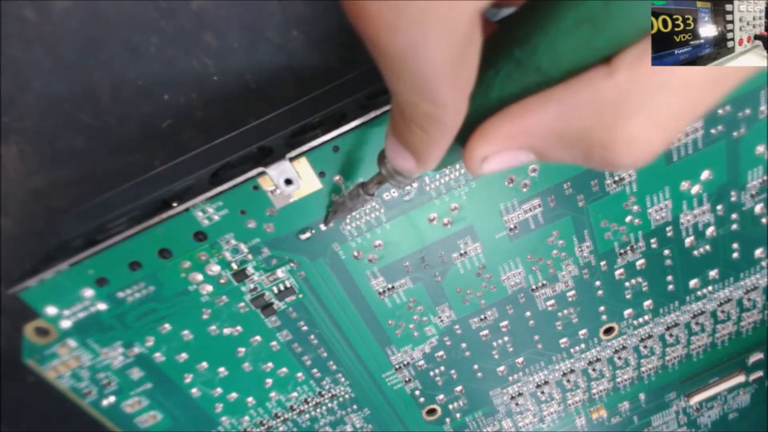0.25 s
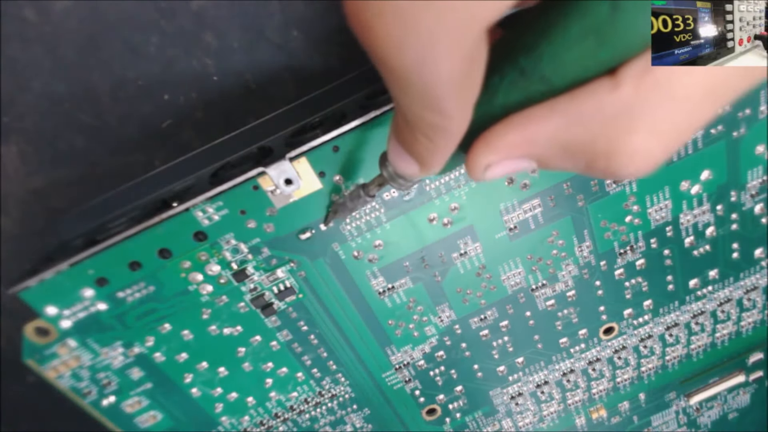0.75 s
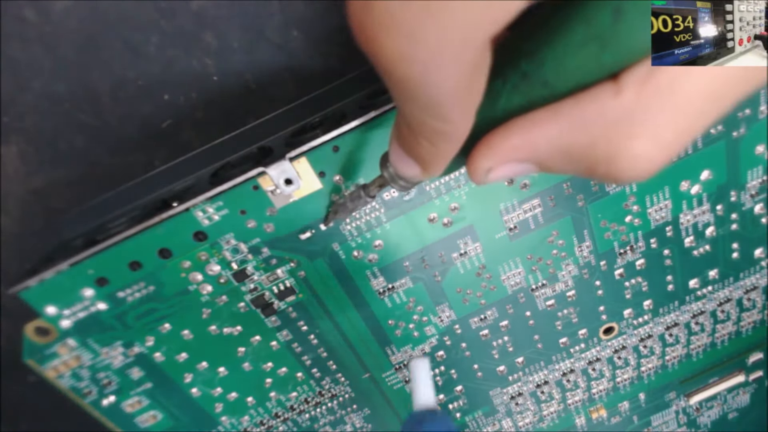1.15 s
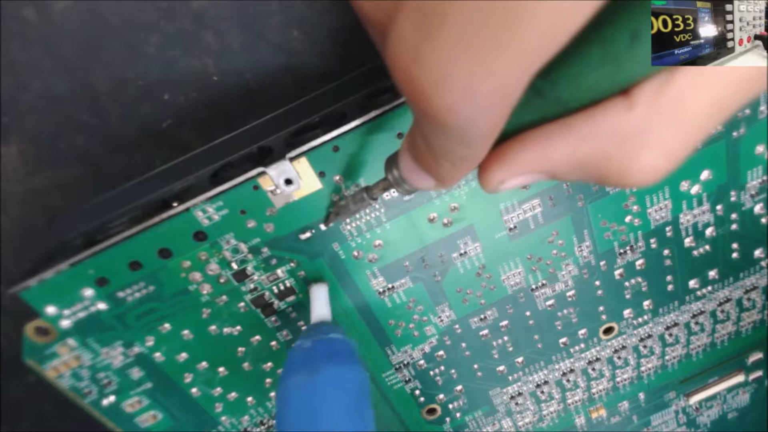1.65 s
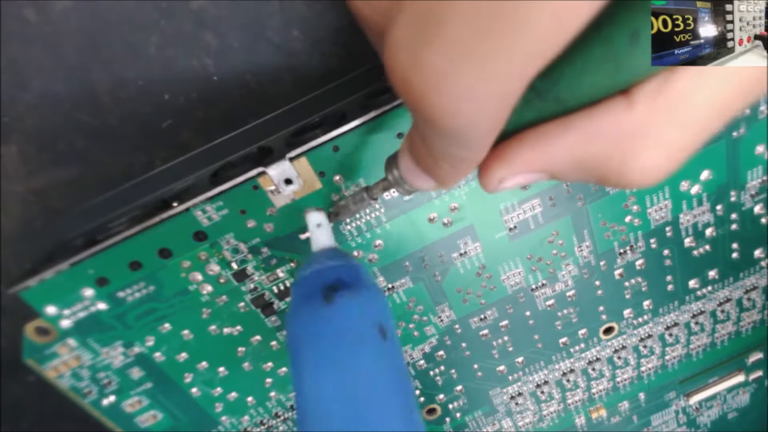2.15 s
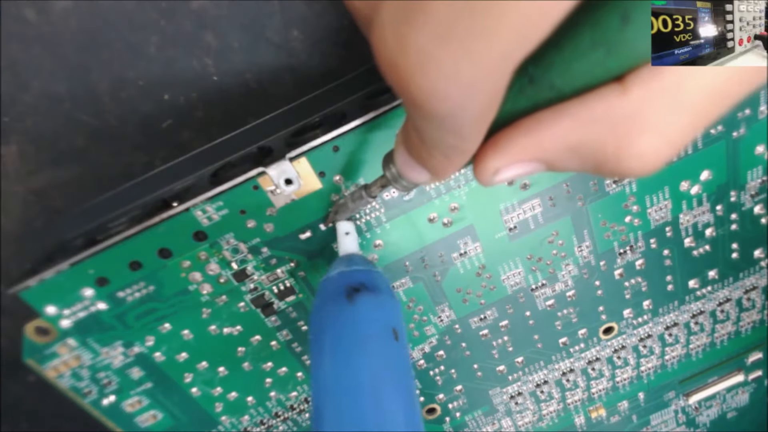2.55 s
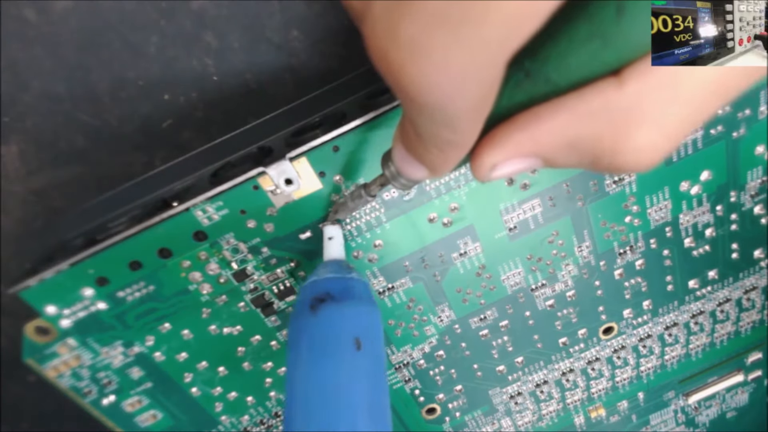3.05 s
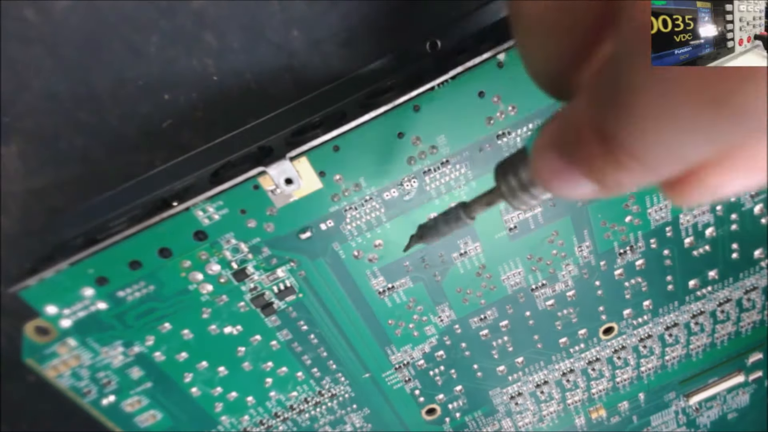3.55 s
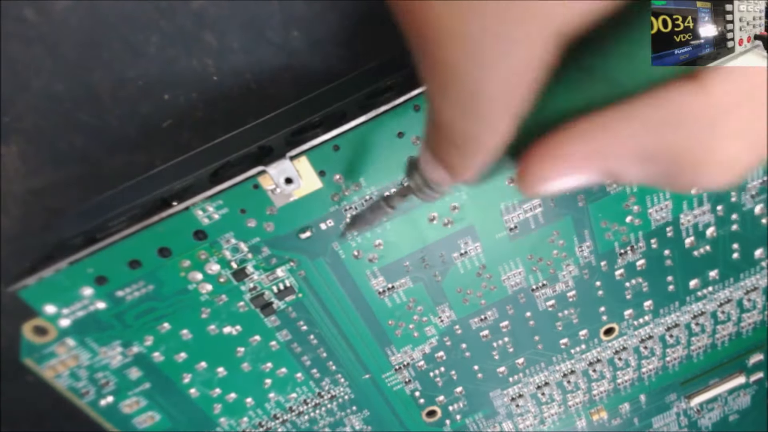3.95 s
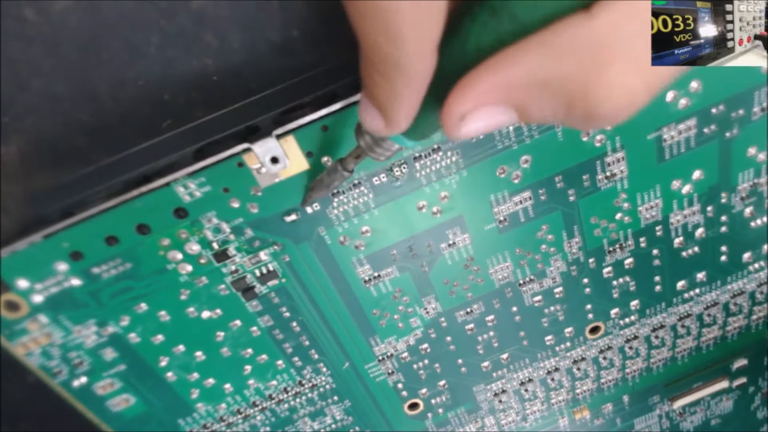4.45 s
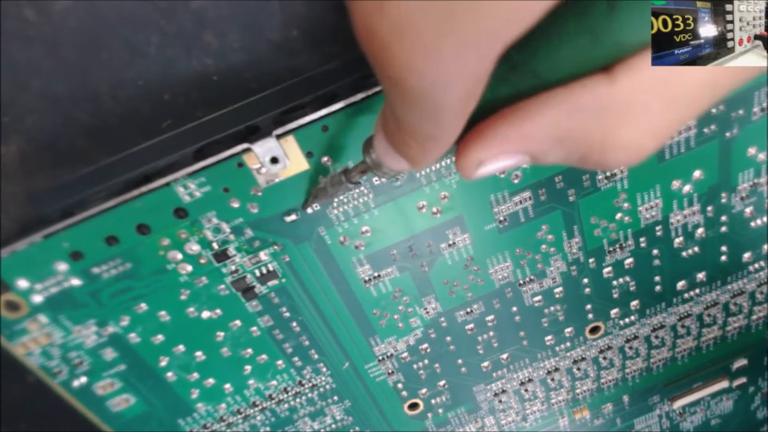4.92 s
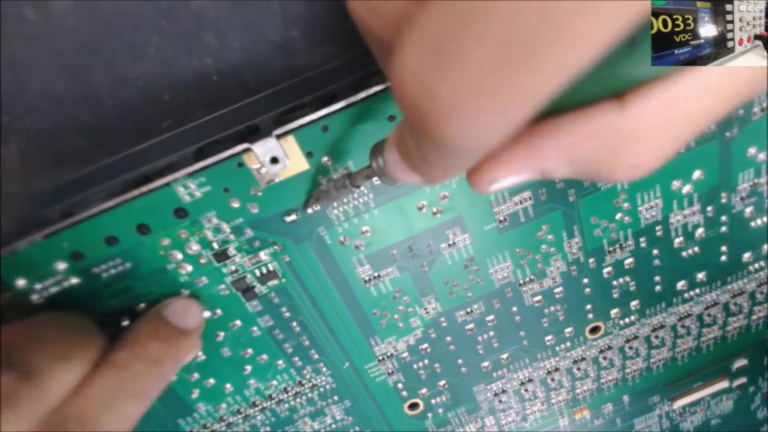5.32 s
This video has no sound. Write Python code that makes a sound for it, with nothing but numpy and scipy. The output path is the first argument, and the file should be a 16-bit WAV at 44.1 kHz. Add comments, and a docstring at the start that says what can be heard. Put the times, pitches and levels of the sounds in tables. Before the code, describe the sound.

A steady low hum of fans and mains, slightly wavering, with soft fluttering air, continues throughout in a small repair shop, heard close in stereo. For the first two seconds there are only very faint rubs and hisses of fingers and tools. Near 2.3 and 2.4 s come a light scrape and soft dull bumps. At 3.07 s a sharp trigger click, and at 3.13 s the spring-loaded pump fires: an extremely loud, brief crack with a bright, tinny rattle and a hard thud, with small clicks after it. Faint short squeaks follow around 3.4 to 3.6 s. From 3.75 to 4.2 s the metal tip ticks, scrapes and taps the ringing board, with heavier bench knocks near 4.05 s. After a quiet gap, 4.58 to 5.0 s brings hissing, gritty plunger strokes and strong snappy clicks as it latches. Then barely audible rubbing, a tiny tick at 5.4 s and hum.

```python
"""On a repair bench in a small shop, a spring-loaded solder pump is fired at a circuit board, close by.
The trigger clicks; the piston flies up and hits its stop: shaped noise with a cluster of high tones.
Tools scrape and bump the bench (friction and blows through resonances), and the plunger is slid back
until it latches (hiss, rasp and clicks). Fans and mains hum drone: wavering tones over fluttering air."""
import sys
import numpy as np
from scipy import signal
from scipy.fft import rfft, irfft, next_fast_len
from scipy.io import wavfile
from scipy.ndimage import uniform_filter1d

SR = 44100
rng = np.random.default_rng(int(sys.argv[2]) if len(sys.argv) > 2 else 0)


def generate_wav(signal):
    """Clip the signal to [-1, 1] and save it as 16-bit WAV at the path in sys.argv[1]."""
    frames = np.transpose(np.atleast_2d(signal))
    scaled = np.clip(frames, -1, 1) * 32767
    pcm = np.round(scaled).astype(np.int16)
    wavfile.write(sys.argv[1], SR, pcm)


N = 246078
TIME = np.arange(N) / SR  # seconds

# left-right likeness of close sounds: frequency_hz, likeness (0 to 1)
CLOSE_LIKENESS = [(600, 0.71), (1500, 0.54), (3000, 0.55), (6000, 0.11)]


def amp(db):
    """Decibels to gain."""
    return 10 ** (np.asarray(db) / 20)


def unit(x):
    """Scales to rms 1."""
    return x / np.sqrt(np.mean(x ** 2) + 1e-20)


def read(points, hz):
    """Reads a table on a log-frequency axis."""
    f, value = np.transpose(points)
    return np.interp(np.log(hz + 1), np.log(f + 1), value)


def add(mix, s, sound):
    """Mixes a sound in at time s, cut where the mix ends."""
    part = mix[..., round(s * SR):][..., :sound.shape[-1]]
    part += sound[..., :part.shape[-1]]


def colour(x, spectrum):
    """Gives x the tone of a spectrum table, at rms 1."""
    size = next_fast_len(x.shape[-1])
    gain = amp(read(spectrum, np.fft.rfftfreq(size, 1 / SR)))
    return unit(irfft(rfft(x, size) * gain, size)[..., :x.shape[-1]])


def band(x, lo_hz, hi_hz):
    """Causal band-pass."""
    edges_hz = [lo_hz, min(hi_hz, SR / 2.1)]
    return signal.sosfilt(signal.butter(3, edges_hz, "band", fs=SR, output="sos"), x)


def drift(per_s):
    """Random wander of rms 1, with per_s random points a second."""
    knots = rng.standard_normal(4096)
    return unit(np.interp(TIME * per_s, np.arange(len(knots)), knots))


def ring(modes):
    """Impulse response of damped modes: each is a sine that falls 60 dB in its t60."""
    t = TIME[:SR // 3]
    return sum(amp(db - 60 * t / t60) * np.sin(2 * np.pi * hz * t) for hz, db, t60 in modes)


def through(x, response):
    """Convolves each channel with a response."""
    return signal.oaconvolve(np.atleast_2d(x), np.atleast_2d(response), axes=1)[:, :N]


def ears(x, likeness):
    """Blends two unrelated noises into a stereo pair, as alike at each frequency as the table says."""
    size = next_fast_len(N, True)
    left, other = rfft(x, size)
    same = np.clip(read(likeness, np.fft.rfftfreq(size, 1 / SR)), 0, 1)
    right = same * left + np.sqrt(1 - same ** 2) * other
    return irfft(np.array([left, right]), size)[:, :N]


def envelope(rows, attack_s, release_s):
    """Gain over time for (start, length, dB, swell dB) rows: each rises, swells while held, dies away."""
    out, t = np.zeros(N), TIME[:2 * SR]
    for start, length, db, swell_db in rows:
        attack = np.minimum(t / attack_s, 1)
        held = amp(db + swell_db * (np.minimum(t / length, 1) - 1))
        release = np.exp(-np.maximum(t - length, 0) / release_s)
        add(out, max(start, 0), attack * held * release)
    return out


def slips(per_s, spread_db, smooth):
    """Stick-slip friction: tiny catches of uneven size over a smooth hiss."""
    size = amp(spread_db * np.minimum(rng.exponential(1, N), 4))
    catches = (rng.random(N) < per_s / SR) * size
    return unit(catches * rng.standard_normal((2, N))) + smooth * rng.standard_normal((2, N))


def blows(rows):
    """Force over time for (s, dB, hardness Hz) rows: harder blows are shorter."""
    force = np.zeros(N)
    for s, db, hz in rows:
        u = 2 * np.pi * hz * TIME[:SR // 20]
        add(force, s, 2 * amp(db) * np.diff(u * np.exp(-u)))
    return force


def fans(waver_hz=0.51, throb=0.19, hum_db=0, spread=0.019, flutter_db=0.85, air_db=-43, lag_s=0.00009):
    """Fan and mains tones waver in pitch and level over the gently fluttering rush of the fans."""
    # fan and mains tones: pitch_hz, level_db (rms)
    tones = [(82.5, -57), (115.2, -53), (120, -57.5), (157, -65), (184.7, -47.5), (236, -61),
             (332.5, -57.5), (345.6, -52), (355.2, -50.5), (369.5, -56.5), (460.8, -60), (470.4, -65),
             (479.9, -46.5), (585.6, -68), (923.6, -64), (961, -65.5), (997.3, -70), (1036.9, -77),
             (1384, -71.5), (2073.7, -71), (9194, -71)]
    # rush of the fans: frequency_hz, density_db (relative, per Hz)
    rush = [(15, 9), (36, 0.5), (55, -0.5), (85, -2.5), (140, -4.5), (240, -2), (300, -8.5), (500, -2.5),
            (660, -14), (950, -13.5), (1400, -20), (5200, -26), (7800, -27), (8600, -20), (10000, -24.5),
            (13000, -24.5), (14300, -33), (15800, -37)]
    # left-right likeness of the rush: frequency_hz, likeness (0 to 1)
    rush_likeness = [(40, 0.047), (150, 0.97), (640, 1), (1400, 0.92), (3100, 0.62), (7000, 0.033)]
    hum = np.zeros((2, N))
    for hz, db in tones:
        turns = np.cumsum(hz + waver_hz * drift(5.08)) / SR + rng.random()
        phase = 2 * np.pi * turns + spread * rng.standard_normal((2, 1))
        level = np.sqrt(2) * amp(db + hum_db) * (1 + throb * drift(6.3))
        hum += level * np.sin(phase)
    air = colour(ears(rng.standard_normal((2, N)), rush_likeness), rush)
    left, right = hum + amp(air_db + flutter_db * drift(30)) * air
    # the fans stand to the right and reach the left side later
    return np.array([np.roll(left, round(lag_s * SR)), right])


def plunger(attack_s=0.0071, release_s=0.02, rasp_db=-6, firm_db=-22, growth=0.52,
            rasp_lo_hz=10200, rasp_hi_hz=13600):
    """The seal judders and hisses along the barrel; pressed harder it also catches in a gritty rasp."""
    # plunger sliding in the barrel, fingers and tools rubbing on it:
    # start_s, length_s, final_level_db (relative), swell_db (rise while held; negative sinks)
    strokes = [(0.0, 0.17, -54, -2), (.66, 0.063, -43.5, 9), (.76, 0.21, -52.5, 0), (1.16, 0.024, -50, -2),
               (2.165, 0.02, -46.5, -4), (2.28, 0.037, -43.5, 2), (2.895, 0.023, -48, -6),
               (3.48, 0.03, -50, -6), (3.695, .02, -46.5, 0), (3.812, 0.031, -32, -5.5),
               (3.897, 0.054, -34.5, 7), (4.035, 0.063, -25, 2), (4.25, 1.27, -50.5, 5),
               (4.415, .01, -51, 6), (4.515, .015, -50, 0), (4.578, 0.015, -27.5, 10),
               (4.642, 0.045, -35, 5), (4.716, 0.018, -27.5, 0), (4.87, 0.065, -44.5, -5),
               (4.922, 0.051, -23, 15), (4.975, 0.011, -31, -4), (5.02, 0.067, -53, 7),
               (5.5, 0.073, -45, 12)]
    # light touch: frequency_hz, density_db (relative, per Hz)
    rub = [(1500, -19), (3600, -15), (4500, -12.5), (5300, -15), (8000, -4.5), (10000, -3.5), (11500, 3),
           (13000, -3), (14500, -3), (15800, -17)]
    judder = amp(2 * drift(per_s=400))
    pressure = judder * envelope(strokes, attack_s, release_s)
    hiss = colour(slips(per_s=2500, spread_db=2.5, smooth=1.2), rub)
    rasp = unit(band(slips(per_s=2500, spread_db=2, smooth=1), rasp_lo_hz, rasp_hi_hz))
    rasp_gain = amp(rasp_db) * (pressure / amp(firm_db)) ** growth
    return pressure * (hiss + rasp_gain * rasp)


def squeaks(waver_db=1):
    """Friction squeaks and hisses: narrow or broad bands of noise that fade in and out."""
    # the iron on the joint and the seal in the barrel:
    # start_s, length_s, level_db (relative), centre_hz, width_hz
    rubs = [(0.657, 0.38, -63, 3950, 450), (1.604, .08, -61.5, 4500, 1500), (3.399, 0.047, -53, 1415, 139),
            (3.53, 0.068, -55.5, 1400, 140), (3.776, 0.0044, -45.5, 4100, 500),
            (4.58, 0.031, -36, 13400, 3600), (4.645, 0.061, -34.5, 13000, 3200),
            (4.952, .035, -25, 12200, 3000), (4.954, 0.045, -44, 5950, 3000),
            (5.12, 0.29, -63.5, 3950, 450)]
    out = np.zeros((2, N))
    for start, length, db, hz, width in rubs:
        progress = np.clip((TIME - start) / length, 0, 1)
        arch = np.tanh(2 * np.sin(np.pi * progress))
        level = amp(db + waver_db * drift(per_s=30))
        out += arch * level * unit(band(rng.standard_normal(N), hz - width / 2, hz + width / 2))
    return out


def scrape(scrape_db=-1, attack_s=0.00073, release_s=0.021, lowest_hz=1250, highest_hz=7000,
           board_rise_s=0.0003):
    """Taps and grainy friction excite the tip's resonances; each tap also rings the board under it."""
    # metal tip dragged over the board: start_s, length_s, final_level_db (relative), swell_db
    drags = [(2.28, 0.026, -54.5, -5.5), (3.815, 0.0072, -35.5, -6), (3.834, 0.0068, -52, -7),
             (3.899, 0.0021, -41.5, -26), (3.947, 0.012, -44.5, 7), (4.038, 0.051, -36, 4.5)]
    # taps of the tip; the board rings at a different pitch on each spot:
    # start_s, tip_level_db, board_level_db (both relative), pitch_hz, t60_s
    taps = [(3.8145, -30, -33.5, 3600, 0.018), (3.8205, -39, -29.5, 2450, 0.032),
            (3.8355, -39, -30.5, 1410, 0.072), (3.840, -31, -29, 2270, 0.031),
            (3.8986, -46, -31, 4730, .018), (3.903, -44, -40, 1490, .04), (3.949, -42, -42, 1590, .03),
            (3.956, -37, -42, 2300, .03), (4.0572, -33, -22.5, 1646, 0.037), (4.0675, -19, -30, 2100, .02),
            (4.081, -34, -28, 1320, .02), (4.091, -36, -29, 1060, .025)]
    # resonances of the tip: pitch_hz, level_db (relative), t60_s
    tip_modes = [(1392, -17.5, 0.069), (1550, -27, 0.038), (1705, -21.5, 0.15), (2220, -15.5, 0.014),
                 (2480, -13.5, 0.014), (2770, -11.5, 0.016), (3250, -11, 0.015), (3780, -16, 0.015),
                 (4300, -5, 0.0017), (5350, -12, .012)]
    rough = ears(slips(per_s=700, spread_db=2, smooth=0.4), CLOSE_LIKENESS)
    tip = band(ring(tip_modes), lowest_hz, highest_hz)
    out = amp(scrape_db) * envelope(drags, attack_s, release_s) * unit(through(rough, tip))
    # the board pitch also sets how hard the tip strikes
    out += through(blows([(s, tip_db, hz) for s, tip_db, _, hz, _ in taps]), tip)
    for s, _, board_db, hz, t60 in taps:
        spot = ring([(hz, board_db, t60)])
        add(out, s, spot * (1 - np.exp(-TIME[:len(spot)] / board_rise_s)))
    return out


def knocks(drag_attack_s=0.0065, drag_release_s=0.023, drag_lo_hz=200, drag_hi_hz=700):
    """Hard blows reach the bench's high modes, slow shoves make it sway; the shifting board judders."""
    # blows and shoves on board and bench: start_s, level_db (relative), hardness_hz (pitch favoured)
    hits = [(2.284, -39, 690), (2.438, -35, 280), (3.13, -17.5, 330), (3.1318, -16.5, 1110),
            (3.156, -30, 45), (3.815, -31, 110), (4.0435, -28, 280), (4.047, -28, 280), (4.051, -18, 37),
            (4.0575, -20, 1700), (4.067, -28, 222), (4.0808, -22.5, 250), (4.108, -28, 150)]
    # the board shifts on the bench as the hand lands:
    # start_s, length_s, final_level_db (relative), swell_db
    shifts = [(4.044, .05, -33, -4)]
    # resonances of the bench: pitch_hz, level_db (relative), t60_s
    bench_modes = [(37.4, 2, 0.28), (66.7, -3, 0.15), (110.6, 2.5, 0.044), (190, -3, 0.055),
                   (225, -2.5, 0.074), (310, 4, 0.029), (500, 0.5, 0.024), (680, 3.5, 0.009),
                   (1070, -0.5, 0.014), (1530, 1.5, 0.011)]
    # neighbouring modes swing in opposite senses
    bench = ring(bench_modes[::2]) - ring(bench_modes[1::2])
    judder = unit(through(band(rng.standard_normal(N), drag_lo_hz, drag_hi_hz), bench))
    shifting = envelope(shifts, drag_attack_s, drag_release_s) * judder
    return through(blows(hits), bench) + shifting


def clicks(tick_s=0.00089, clack_s=0.0023, rise_s=0.00006, tick_hz=11550, tick_width=1.307,
           clack_width=1.84, tick_db=0, clack_db=0, knock_db=-1):
    """Each contact is a bright tick, a mid clack and a dull knock of the grip."""
    # clicks of trigger, spring, catch and tip: start_s, level_db (relative),
    # knock_level_db, clack_level_db (both relative to the click), clack_pitch_hz, left_over_right_db
    contacts = [(3.0676, -4, -30, -11.5, 9200, -2), (3.156, -21, -19, -12, 6500, 2),
                (3.163, -22.5, -25, -9, 5000, 0), (3.207, -32, -16, -3.5, 6000, -12),
                (3.221, -30, -27, -22, 3500, -6), (3.7556, -31, -17, -12, 2270, -2),
                (3.7774, -29.5, -10, -8, 4270, 3), (3.815, -31.5, -2, -5, 4000, 13),
                (3.8213, -23, -28, -6, 2380, -8), (3.899, -19, -13, -9.5, 4760, -4),
                (3.902, -22, -13, -11, 4700, 3), (3.921, -38, -22, 1, 6000, 0),
                (3.946, -20, -28, -18, 4000, -4), (4.039, -22, -25, -11, 3600, 0),
                (4.0605, -17.5, -12.5, -16, 3000, 17), (4.0846, -10.5, -12, -11, 5030, 8),
                (4.091, -22.5, -23, -8, 4000, -4), (4.1798, -26.5, -21, -11.5, 2920, 1),
                (4.2172, -25, -20, -13.5, 3330, -1), (4.651, -28, -30, -18, 4500, -2),
                (4.7181, -9.5, -34, -21, 5100, 4), (4.7317, -19.5, -4, -18, 2210, -4),
                (4.739, -11.5, -22, -13.5, 5100, 1), (4.838, -31, -22, -22, 4000, -3),
                (4.8572, -8, -15.5, -30.5, 3500, -4), (4.861, -16.5, -25, -18, 4070, -11),
                (4.864, -11, -14, -23.5, 3360, 4), (4.905, -32, -16, -4, 2980, 2),
                (4.961, -16, -39, -31, 5160, -12), (4.9946, -7.5, -34, -15, 4630, 3),
                (5.4106, -36, -25, -18, 5000, 0)]
    # dull knock of the pump's plastic grip: pitch_hz, level_db (relative), t60_s
    grip_modes = [(544, 1, 0.013), (705, -3, 0.021), (820, -7, 0.027)]
    out, t = np.zeros((2, N)), TIME[:SR // 25]
    grip = ring(grip_modes)[:len(t)]

    def burst(decay_s, hz, width, channels):
        """A dying crackle in the band around hz, with a smoothed peak level of 1."""
        crackle = rng.choice([-1, 1], (channels, len(t)))
        shape = (1 - np.exp(-t / rise_s)) * np.exp(-t / decay_s)
        x = band(crackle * shape, hz / width, hz * width)
        power = uniform_filter1d(x ** 2, size=40)
        return x / np.sqrt(power.max(axis=1, keepdims=True))

    for s, db, knock, clack, clack_hz, pan in contacts:
        hit = amp(tick_db) * burst(tick_s, tick_hz, tick_width, channels=2)
        hit += amp(clack + clack_db) * burst(clack_s, clack_hz, clack_width, channels=1)
        hit += amp(knock + knock_db) * grip
        add(out, s, amp(db) * amp([[pan / 2], [-pan / 2]]) * hit)
    return out


def snap(fire_s=3.1298, flight_s=0.013, chatter_db=-3, sag_db=-7.5, rise_s=0.0028, cut_s=0.00049,
         stop_after_s=0.014, stop_db=3.0, stop_s=0.0002,
         quiver_db=-29, quiver_s=0.014, quiver_fade_s=0.012, rattle_db=2, tones_db=-3.5,
         slam_after_s=0.00187, crack_db=-8, crack_s=0.004):
    """The piston cracks, chatters as a bright rattle with tones inside, hits its stop; the spring quivers."""
    # steady tones inside the bright rattle: pitch_hz, level_db (relative)
    high_tones = [(2670, -20), (3774, -20), (8305, -6), (9980, -11), (10320, -7), (10680, -7), (11050, 0),
                  (11450, -2), (11855, -4), (12440, -4), (12690, -6), (13185, -2), (13600, -8),
                  (15350, -12)]
    # the rattle: frequency_hz, density_db (relative, per Hz)
    rattle_tone = [(200, -20), (1100, -19), (1600, -9), (3300, -16.5), (4700, -14), (6000, -6), (8500, 0.5),
                   (11200, 7), (13500, 6), (15500, -5.5)]
    # the first slam: frequency_hz, density_db (relative, per Hz)
    crack_tone = [(90, -21), (200, 3.5), (450, 2), (700, -4.5), (1150, -5), (1600, -7), (2400, -3),
                  (3400, -4), (4800, -23), (8000, -36)]
    motion = envelope([(fire_s, flight_s, chatter_db, sag_db)], rise_s, cut_s)
    motion += envelope([(fire_s + stop_after_s, stop_s, stop_db, 0)], stop_s / 2, cut_s)
    motion += envelope([(fire_s, quiver_s, quiver_db, 0)], rise_s, quiver_fade_s)
    uneven = amp(rattle_db * drift(per_s=700))
    rattle = uneven * colour(ears(rng.standard_normal((2, N)), CLOSE_LIKENESS), rattle_tone)
    tones = unit(sum(amp(db) * np.sin(2 * np.pi * (hz * TIME + rng.random((2, 1))))
                     for hz, db in high_tones))
    t = TIME - fire_s - slam_after_s
    crack_noise = colour(ears(rng.standard_normal((2, N)), CLOSE_LIKENESS), crack_tone)
    crack = (t > 0) * np.exp(-abs(t) / crack_s) * crack_noise
    return motion * (rattle + amp(tones_db) * tones) + amp(crack_db) * crack


def room(x, wet_db=-19, near_db=-17, near_t60=0.081):
    """Quick scatter from the bench top and the short tail of the shop: sparse decaying echoes."""
    # decay of the shop: frequency_hz, t60_s
    decay = [(100, 0.64), (1000, 0.33), (5000, 0.33), (11000, 0.23), (15500, 0.12)]
    t = TIME[:SR // 2]
    shape = (2, len(t))
    echoes = rng.standard_normal(shape) * (rng.random(shape) < 0.1) * (t > 0.0015)
    hz, frame_s, z = signal.stft(echoes, SR, nperseg=256)
    fade = amp(-60 * frame_s / read(decay, hz)[:, None])
    tail = signal.istft(z * fade, SR, nperseg=256)[1][:, :len(t)]
    near = echoes[::-1] * amp(-60 * t / near_t60)  # sides swapped
    response = amp(wet_db) * tail / np.linalg.norm(tail[0])
    response += amp(near_db) * near / np.linalg.norm(near[0])
    return x + through(x, response)


def scene(pump_db=-4.5):
    """Pump, tools and bench echo in the shop; the fans are added without echo."""
    pump = plunger() + clicks() + snap()
    return room(amp(pump_db) * pump + squeaks() + scrape() + knocks()) + fans()


def record(dry, ceiling=1.06, edge_hz=16100):
    """Loud peaks overload the input softly; then a steep low-pass sets the band limit."""
    soft = ceiling * np.tanh(dry / ceiling)
    low_pass = signal.firwin(129, edge_hz, window=("kaiser", 7), fs=SR)
    undelayed = np.minimum(np.arange(N) + 64, N - 1)  # takes back the filter's 64 samples of delay
    return through(soft, low_pass)[:, undelayed]


dry = scene()
out = record(dry)
generate_wav(out)
```